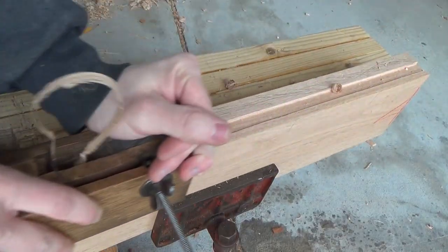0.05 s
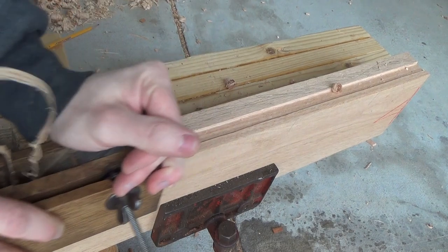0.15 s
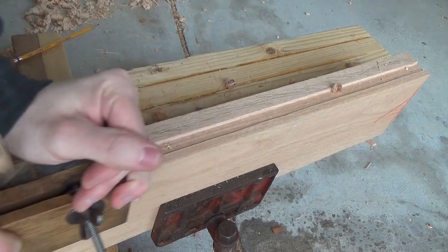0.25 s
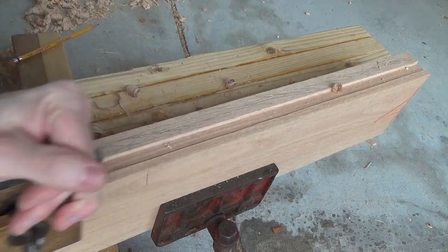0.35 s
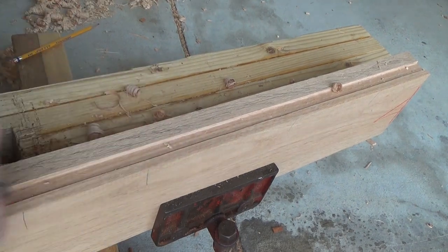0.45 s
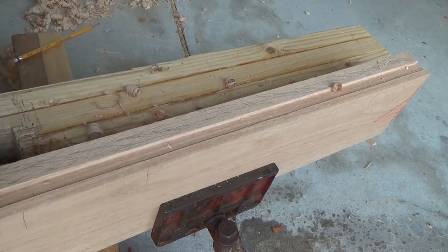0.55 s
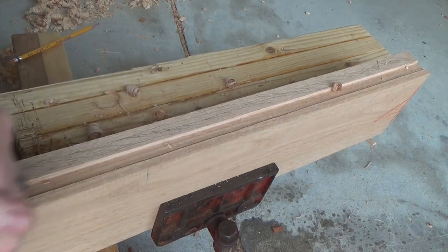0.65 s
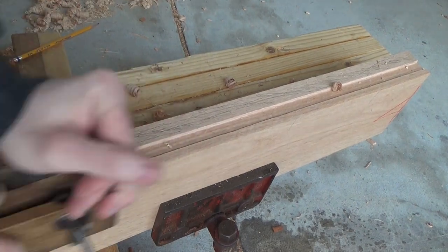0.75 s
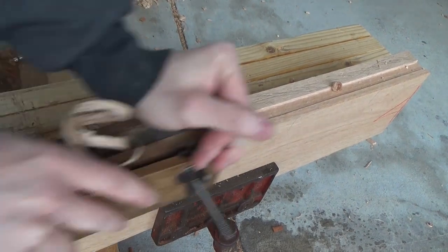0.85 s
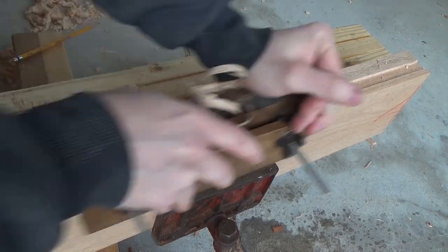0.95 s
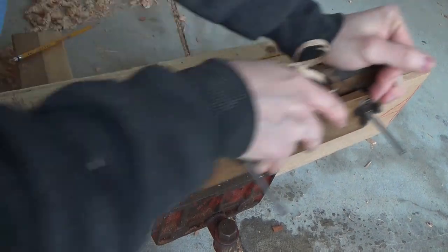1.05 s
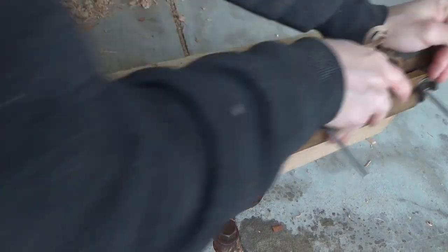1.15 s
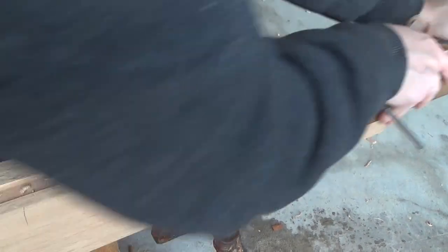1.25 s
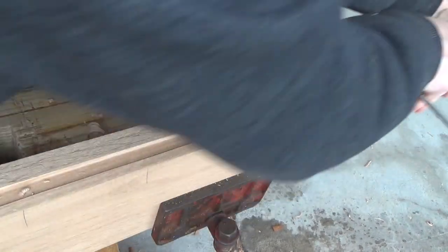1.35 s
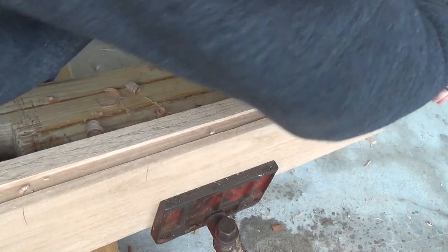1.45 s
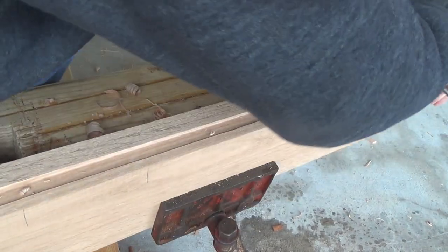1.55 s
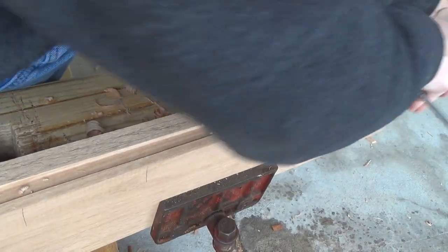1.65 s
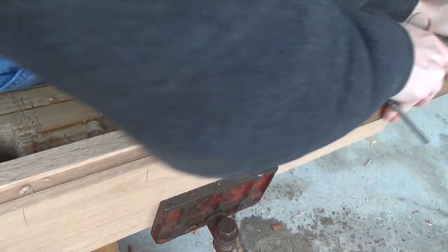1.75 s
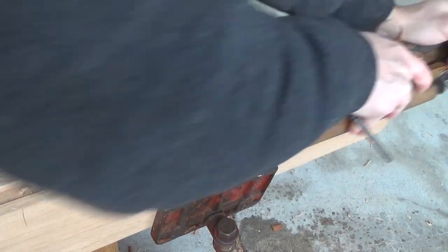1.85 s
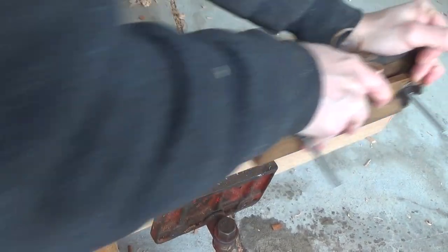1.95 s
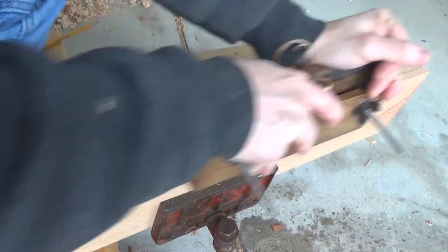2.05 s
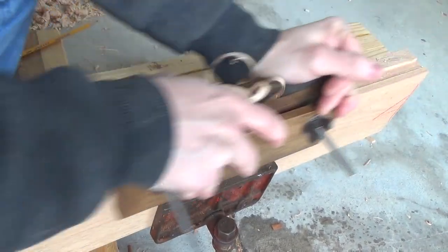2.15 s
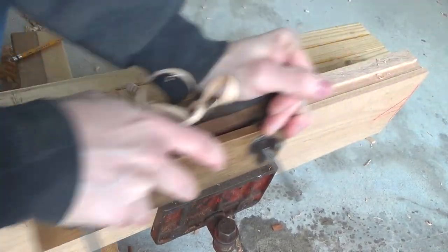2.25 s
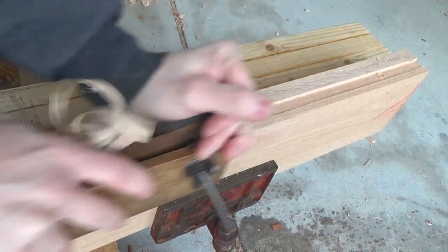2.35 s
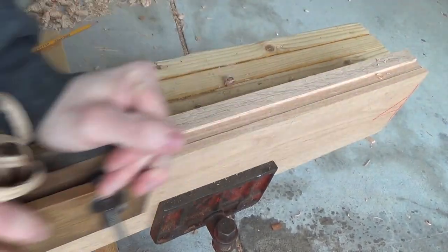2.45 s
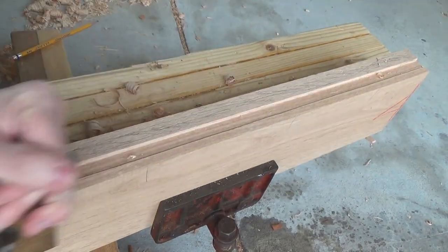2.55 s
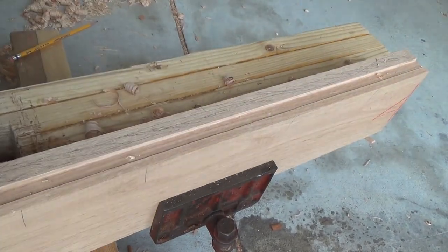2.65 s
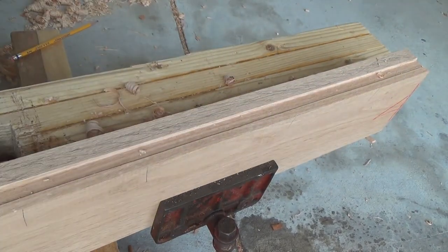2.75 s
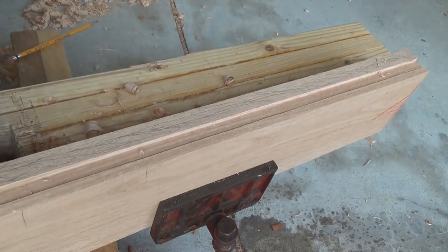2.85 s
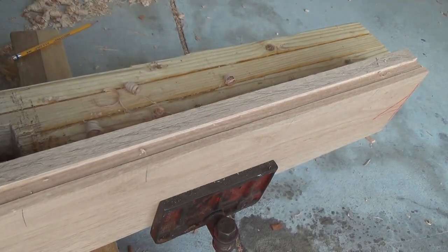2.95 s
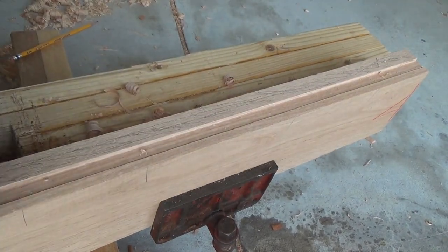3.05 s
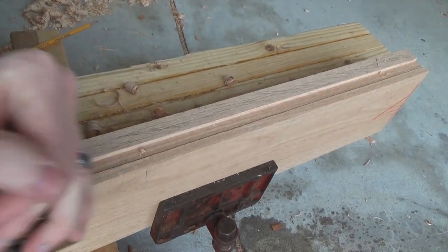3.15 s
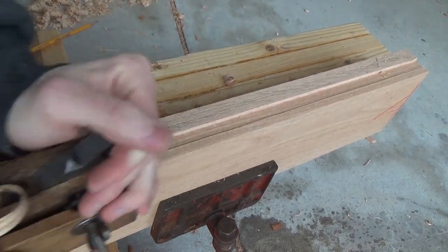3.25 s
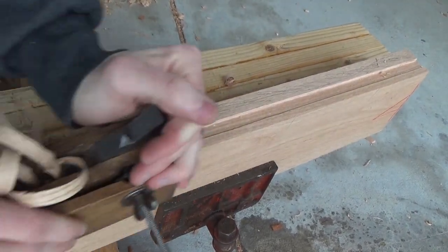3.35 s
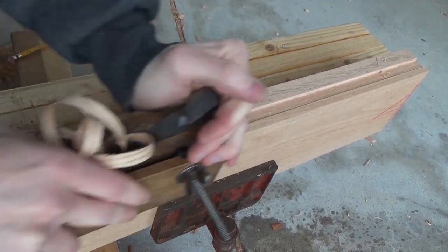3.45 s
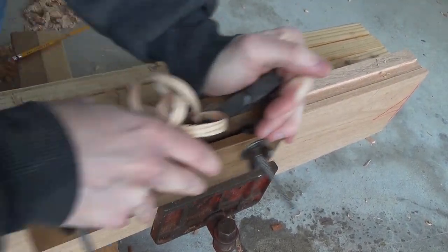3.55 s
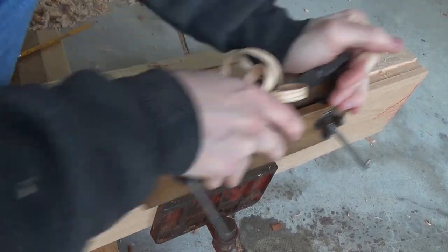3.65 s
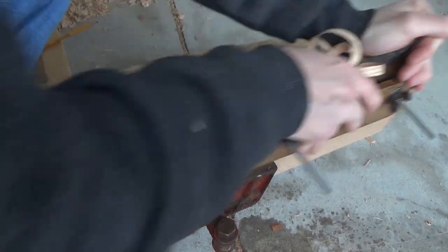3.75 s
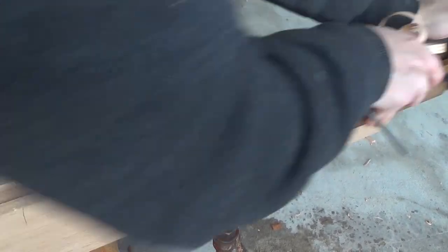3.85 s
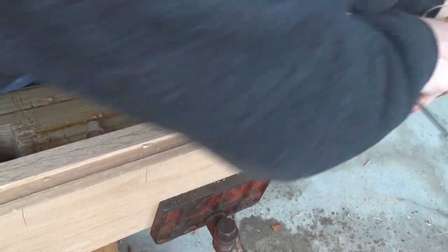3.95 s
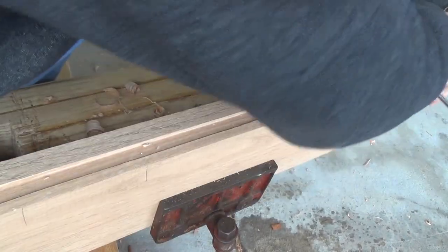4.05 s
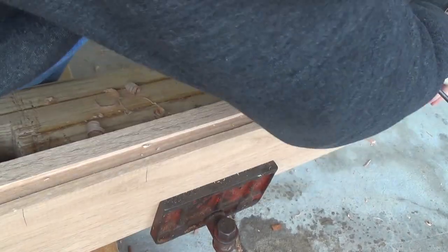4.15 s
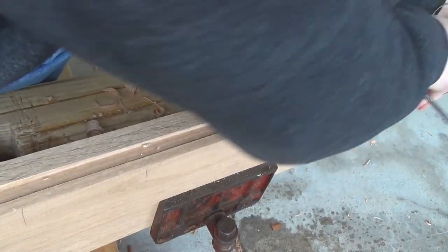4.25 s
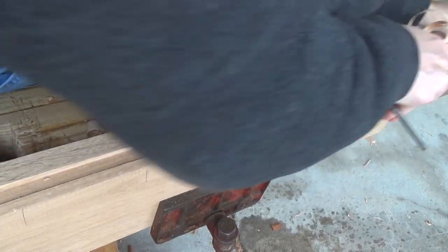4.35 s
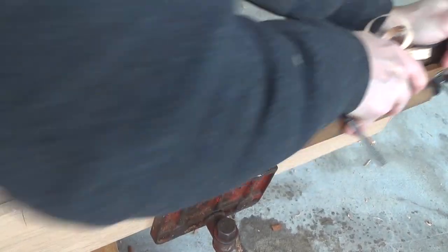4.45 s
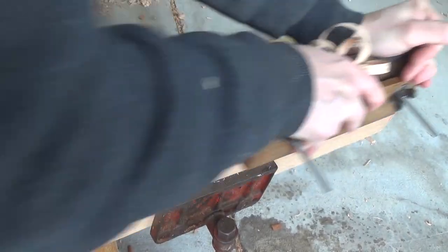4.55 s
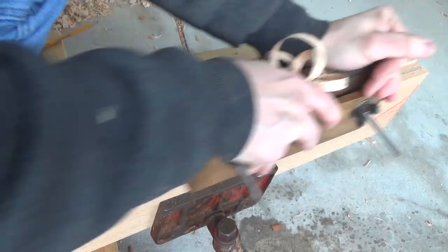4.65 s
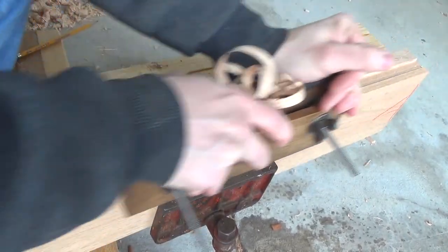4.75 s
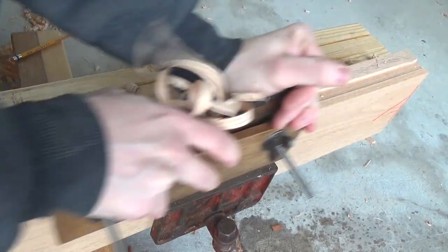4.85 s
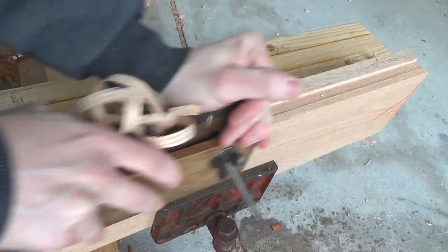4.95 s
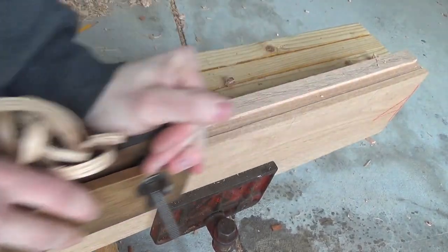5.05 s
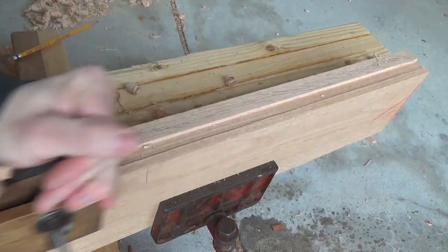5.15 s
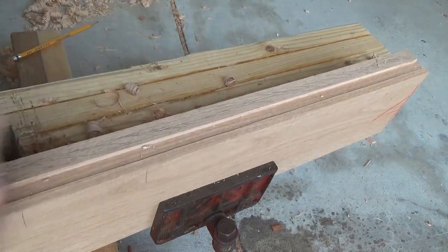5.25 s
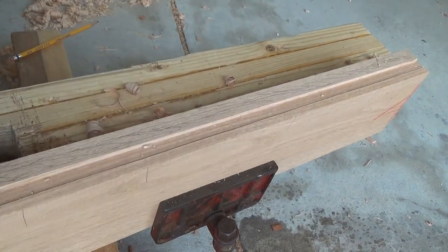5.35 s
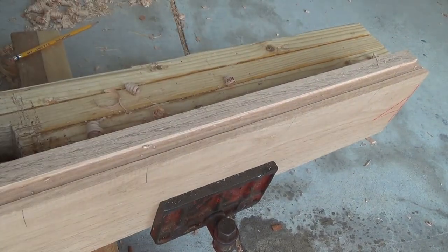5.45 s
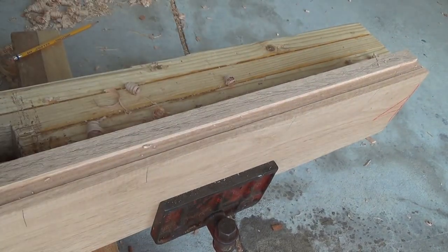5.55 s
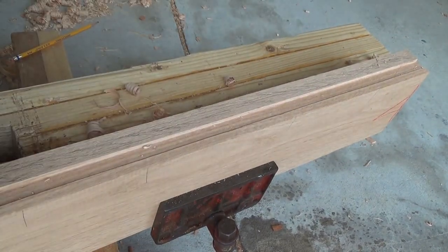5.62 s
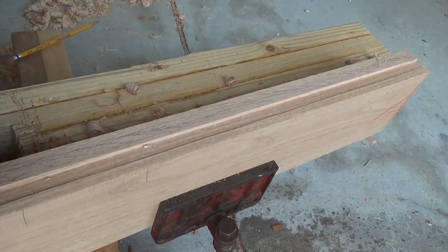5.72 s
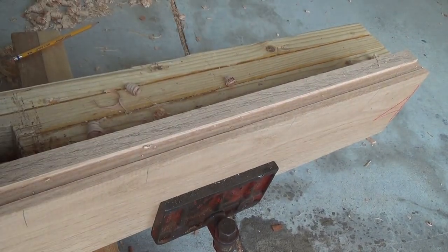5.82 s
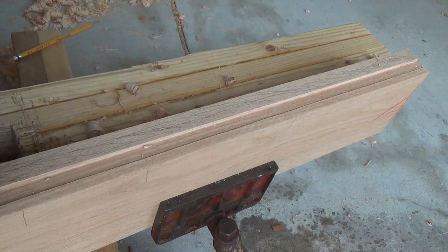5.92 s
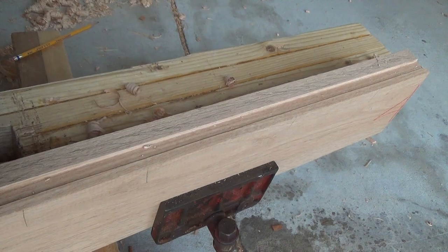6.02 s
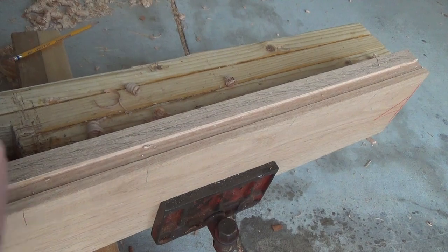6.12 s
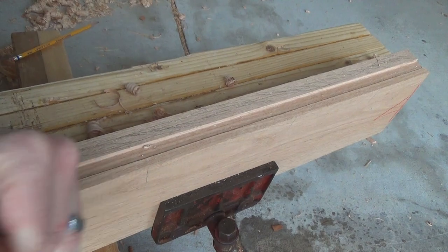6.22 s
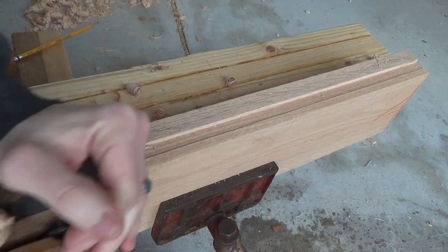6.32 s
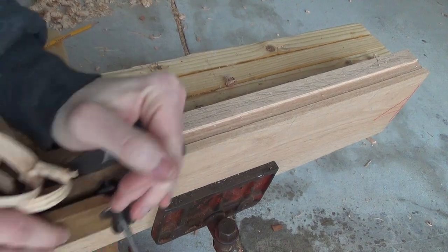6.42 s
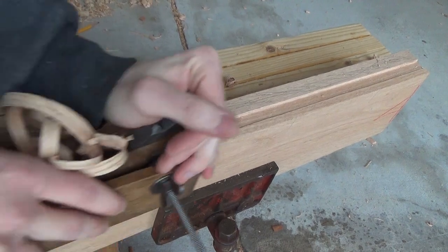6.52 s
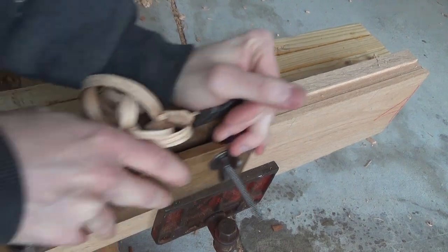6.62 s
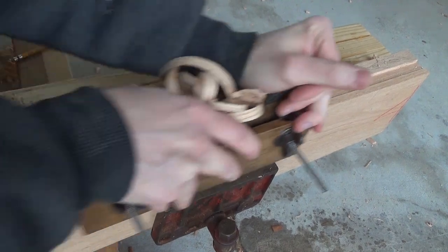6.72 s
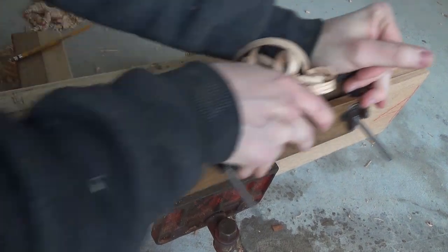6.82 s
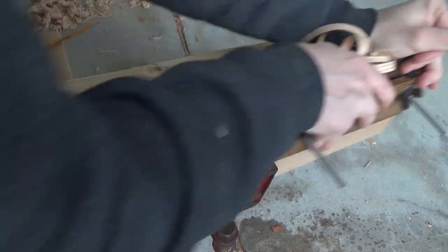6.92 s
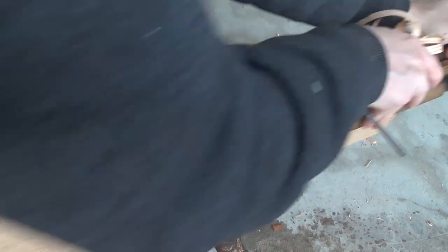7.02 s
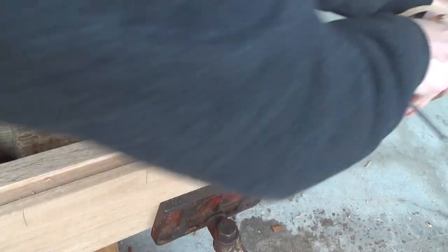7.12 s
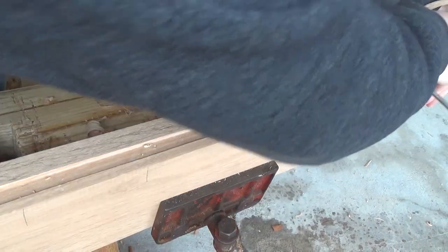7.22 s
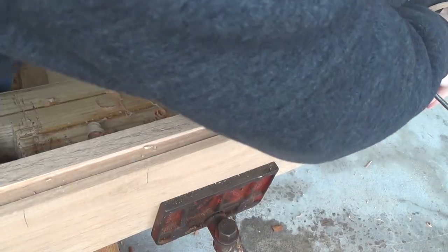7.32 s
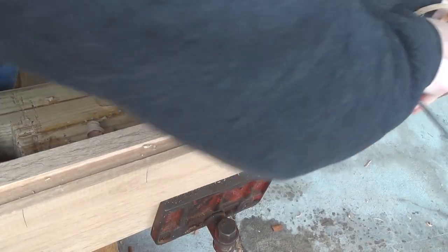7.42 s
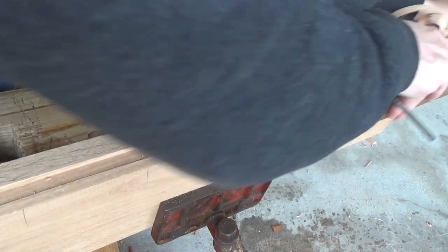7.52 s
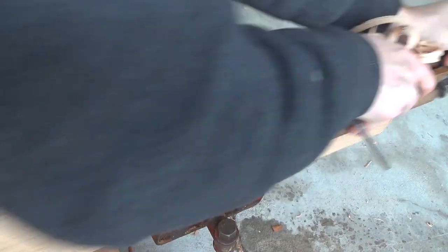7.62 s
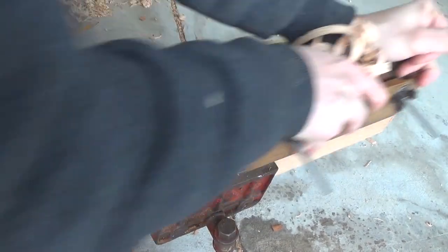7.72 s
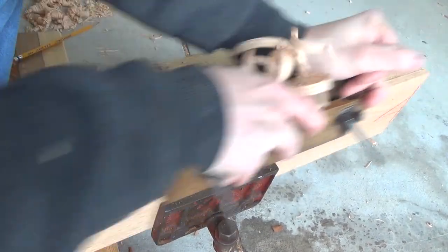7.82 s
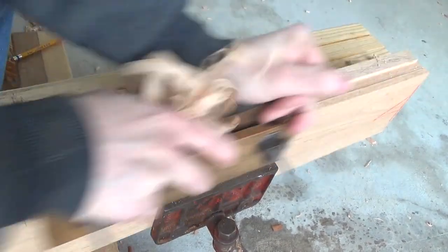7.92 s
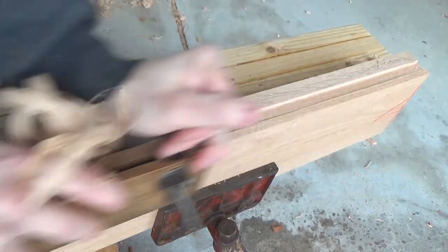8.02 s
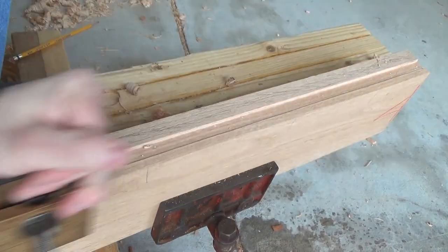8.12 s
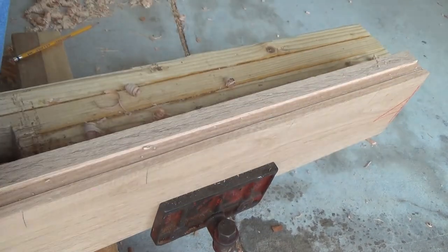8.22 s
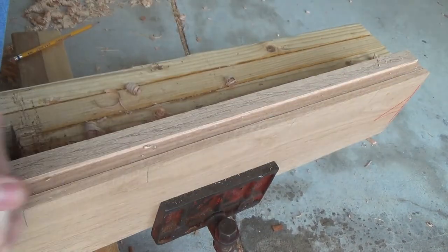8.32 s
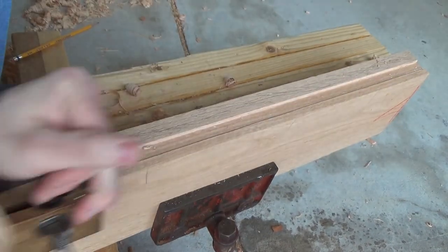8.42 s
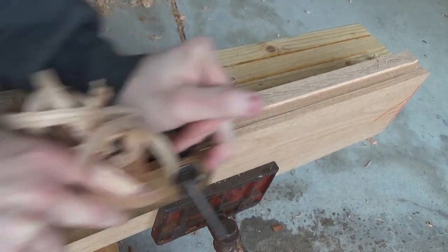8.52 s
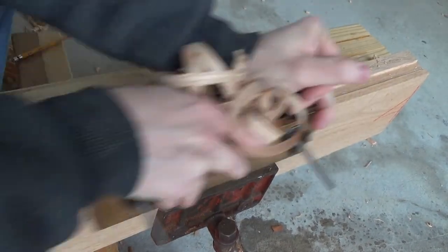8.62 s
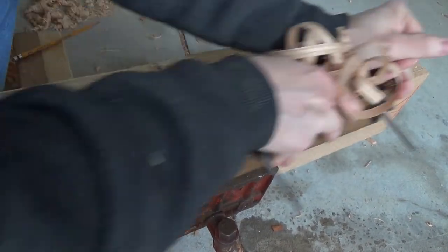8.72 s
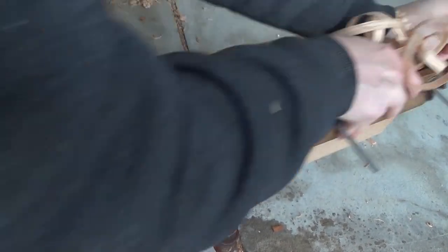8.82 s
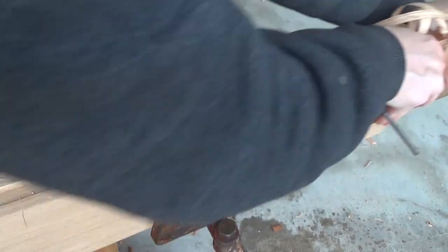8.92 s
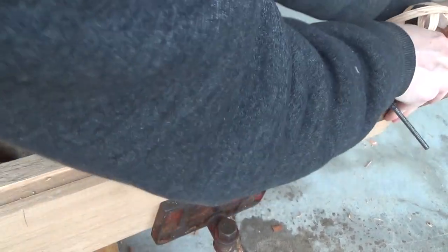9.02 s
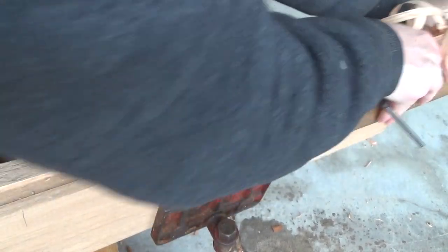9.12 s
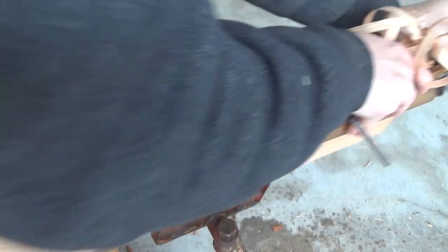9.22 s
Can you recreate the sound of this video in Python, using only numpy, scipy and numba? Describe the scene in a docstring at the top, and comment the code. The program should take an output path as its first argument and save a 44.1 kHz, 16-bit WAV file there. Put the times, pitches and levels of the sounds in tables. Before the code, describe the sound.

A wooden hand plane works a clamped hardwood board, close by in a small, slightly reverberant workshop. It opens mid-cut, a gritty rasp with a low groan, ending in clicks at 0.5 seconds. Further cuts run from 1.8 to 2.7, 4.4 to 5.3, 7.5 to 8.2 and 9.2 to 10 seconds, each growing hissier as it goes; the middle three carry a hollow, wavering blade chatter. Duller return slides begin around 0.7, 3.5, 6.5 and 8.5 seconds. The plane knocks on the board as it lands and stops, most strongly near 1.4, 5.5, 6.5, 7.2 and 8.5 seconds. Sharp small clicks cluster around 2.8, 3.5 and 6.5 seconds. Soft bumps and rustles of sleeves and shavings fill the pauses near 3 and 6 seconds. The strokes shift slightly sideways, over a low bench rumble, faint air noise and hum.

```python
"""Hand plane cutting a rebate

A wooden plane works along a hardwood board clamped in a vice, in a small workshop. On each cut the
iron breaks thousands of fibres that ring plane and board; then the sole slides back, duller.
Stick-slip makes the board groan and the iron chatter. The plane knocks as it lands and stops, fence
and shavings click, sleeves rustle, and the bench rumbles over the shop's faint air noise and hum."""
import sys
import numpy as np
from scipy import signal
from scipy.fft import rfft, irfft, next_fast_len
from scipy.io import wavfile
from scipy.ndimage import uniform_filter1d, map_coordinates
from numba import njit

SR = 44100
rng = np.random.default_rng(int(sys.argv[2]) if len(sys.argv) > 2 else 0)


def wav_record(signal):
    """Record a signal, one row per channel, as 16-bit PCM in the file named by sys.argv[1]."""
    frames = np.transpose(np.atleast_2d(signal))
    bounded = np.clip(frames, -1, 1)
    # unit amplitude maps onto the largest positive 16-bit level
    quanta = np.round(bounded * 32767).astype(np.int16)
    wavfile.write(sys.argv[1], SR, quanta)


N = 409236
TIME = np.arange(N) / SR


def undb(db):
    """Decibels to gain."""
    return 10 ** (np.asarray(db) / 20)


def unit(x):
    """Scale to rms 1."""
    return x / np.sqrt(np.mean(x ** 2))


def span(start_s, end_s):
    """Sample times from start to end."""
    return start_s + np.arange(int((end_s - start_s) * SR)) / SR


def add(out, start_s, x):
    """Mix x into out at start_s."""
    i = max(int(start_s * SR), 0)
    out[i:i + len(x)] += x[:len(out) - i]


def fade(t, t60_s):
    """Exponential decay."""
    return np.exp(-np.log(1000) * t / t60_s)


def swell(t, centre, half_width):
    """Gaussian bump, peak 1."""
    return np.exp(-((t - centre) / half_width) ** 2)


def contact(t, ramp_s=0.0088):
    """Stroke gate with short ramps."""
    return np.clip(np.minimum(t - t[0], t[-1] - t) / ramp_s, 0, 1)


def walk(n, rate_hz):
    """Smooth random drift, rms near 1."""
    hold = max(int(SR / rate_hz), 2)
    steps = np.repeat(rng.standard_normal(n // hold + 2), hold)
    return unit(uniform_filter1d(steps, hold))[:n]


def over_pitch(table, hz, column=1):
    """Interpolate a table column over log frequency."""
    rows = np.array(table, float)
    return np.interp(np.log(hz + 1), np.log(rows[:, 0]), rows[:, column])


def band(x, low_hz, high_hz):
    """Causal band-pass."""
    edges_hz = [low_hz, min(high_hz, SR / 2 - 1)]
    return signal.sosfilt(signal.butter(3, edges_hz, "band", fs=SR, output="sos"), x)


def zero_phase(x, order, hz, kind):
    """Forward-backward filter."""
    return signal.sosfiltfilt(signal.butter(order, hz, kind, fs=SR, output="sos"), x)


def body(x, colour, modes=(), size=4096):
    """Minimum-phase body: a smooth spectrum plus resonances."""
    hz = np.arange(size // 2 + 1) * SR / size
    modes_db = sum(lift / (1 + (2 * (hz - centre) / width) ** 2) for centre, width, lift in modes)
    cepstrum = irfft(np.log(undb(over_pitch(colour, hz) + modes_db)))
    cepstrum[1:size // 2] *= 2
    cepstrum[size // 2 + 1:] = 0
    response = irfft(np.exp(rfft(cepstrum)))
    return signal.fftconvolve(x, response)[:len(x)]


def fibres(n, snaps_per_s, spread_db):
    """Dense tiny snaps of uneven size."""
    snaps = rng.random(n) < snaps_per_s / SR
    signs = rng.choice([-1, 1], n)
    sizes = undb(spread_db * np.minimum(rng.exponential(size=n), 5))
    return unit(snaps * signs * sizes)


def shift_modes(x, depth_db=3.2, full_depth_hz=2500, size=512):
    """Small modes swell and sink as grip and contact point move."""
    hz, _, frames = signal.stft(x, nperseg=size)
    patches = rng.standard_normal(frames.shape)
    for _ in range(2):
        patches = uniform_filter1d(patches, size=2, axis=0)
        patches = uniform_filter1d(patches, size=14, axis=1)
    change_db = depth_db * np.minimum(hz / full_depth_hz, 1)[:, None] * unit(patches)
    return signal.istft(frames * undb(change_db), nperseg=size)[1][:len(x)]


def ring_wood(force, colour, modes, place):
    """The wood's modes trade strength as the plane travels from place 0 to 1."""
    early = body(force, colour, [(hz, width, db) for hz, width, db, _ in modes])
    late = body(force, colour, [(hz, width, db) for hz, width, _, db in modes])
    share = np.sin(np.pi / 2 * np.clip(place, 0, 1)) ** 2
    return shift_modes((1 - share) * early + share * late)


def balance(wood, judder_db, ring_db, hiss_db, top_db):
    """Split the wood's vibration into four bands, each with its own level."""
    judder = zero_phase(wood, 4, 540, "low")
    treble = zero_phase(wood, 2, 2600, "high")
    top = zero_phase(treble, 3, 7000, "high")
    parts = [(judder, judder_db, (140, 500)), (wood - judder - treble, ring_db, (700, 2000)),
             (treble - top, hiss_db, (2500, 6500)), (top, top_db, (7000, 14000))]
    return sum(part * undb(db) / np.std(band(wood, *core_hz)) for part, db, core_hz in parts)


# reflections off board, vice and hands: initial_lag_s, gain
CLOSE_ECHOES = [(0.00056, 0.11), (0.00108, 0.18), (0.00131, -0.17), (0.002, -0.16)]


def close_echoes(x, place, lag_growth=0.275):
    """Echo lags grow along the stroke, so comb ridges in the treble sink."""
    stretch = 1 + lag_growth * place ** 2
    treble = zero_phase(x, 2, [1600, 7000], "band")
    return x + sum(gain * map_coordinates(treble, [np.arange(len(x)) - lag_s * stretch * SR], order=3)
                   for lag_s, gain in CLOSE_ECHOES)


# cuts, far end (place 0) to near end (1): start_s, end_s, bite_s, ring_db, hiss_db, shaving_db,
# judder_db, loosest_place, judder_fall_db_per_length
CUT_STROKES = [(-0.5, 0.5, 0.2, -15.5, -24.5, -22.5, -25.5, 0.62, 23),
               (1.755, 2.667, 0.072, -13, -22, -20.5, -21.5, 0.11, 10.5),
               (4.375, 5.307, 0.25, -13.5, -20.5, -20, -23.5, 0.53, 25.5),
               (7.52, 8.23, 0.18, -13, -19, -18.5, -23, 0, 18.5),
               (9.18, 10.0, 0.071, -14, -26, -23, -26, 0.2, 15)]
# cutting spectrum: freq_hz, level_db
CUT_SPECTRUM = [(25, -48), (60, -30), (110, -20), (165, -3.5), (380, -6.5), (560, -4), (1200, 2.5),
                (1900, 0.5), (3600, -5.5), (7000, -4), (9800, 1), (12500, -6), (16000, -17)]
# plane and board modes: centre_hz, width_hz, early_lift_db, late_lift_db
CUT_RESONANCES = [(255, 34, 5, 4.5), (461.5, 16, 4.5, 8.5), (642, 25, 14.5, 6), (774, 73, 8.5, 10.5),
                  (1007, 54, 8, 9.5), (1080, 23, 15, -2), (1337, 243, 0.5, 12), (1550, 90, 10, -1),
                  (2170, 110, 4.5, 3.5), (2440, 110, 4, 6.5), (2810, 190, 9, 4.5), (3054, 140, 6.5, 8),
                  (3940, 180, 6.5, 3.5), (5290, 620, 6, 9.5), (5970, 95, -1, 8), (8460, 880, 3.5, 4),
                  (12100, 2100, -4, 4)]
# hard spots and skips of the iron: centre_s, half_width_s, change_db
HARD_SPOTS = [(0.288, 0.018, 3), (0.368, 0.0076, -8), (0.427, 0.055, 3.8), (2.627, 0.029, 1.5),
              (5.28, 0.02, -1.5), (5.314, 0.0063, -9)]


def cutting(burst_hz=420, grain_hz=55.33, exit_db=6.5, exit_s=0.012, run_out_db_per_s=126):
    """The iron breaks fibres in uneven bursts; the ring fades and the growing shaving swells."""
    out = np.zeros(N)
    for start, end, bite_s, ring_db, hiss_db, shaving_db, judder_db, loosest, fall in CUT_STROKES:
        t = span(max(start, 0), end + 0.3)
        n = len(t)
        place = np.minimum((t - start) / (end - start), 1)
        force = fibres(n, snaps_per_s=9000, spread_db=1.5) * undb(walk(n, burst_hz) + walk(n, grain_hz))
        wood = ring_wood(force, CUT_SPECTRUM, CUT_RESONANCES, place / 0.72)
        shallow = np.clip(1 - (t - start) / bite_s, 0, 1)  # 0 at full bite
        cut = balance(close_echoes(wood, place),
                      judder_db=judder_db - fall * abs(place - loosest),
                      ring_db=ring_db - 9 * shallow - 5 * place,
                      hiss_db=hiss_db - 4.5 * shallow + 2 * place,
                      top_db=shaving_db - 8 * (1 - swell(place, centre=0.72, half_width=0.26)))
        spots_db = sum(db * swell(t, centre_s, half_s) for centre_s, half_s, db in HARD_SPOTS)
        after_s = np.maximum(t - end, 0)  # the iron leaves the wood, then the sole runs out
        release_db = exit_db * np.minimum(after_s / exit_s, 1) + run_out_db_per_s * after_s
        add(out, t[0], cut * undb(spots_db - release_db) * contact(t))
    return undb(-0.23) * out


@njit
def resonate(x, centre_hz, width_hz):
    """State-variable band-pass with a moving centre."""
    out = np.empty(len(x))
    band_state, low_state = 0., 0.
    for i in range(len(x)):
        tuning, damping = np.tan(np.pi * centre_hz[i] / SR), width_hz / centre_hz[i]
        passed = (band_state + tuning * (x[i] - low_state)) / (1 + tuning * (tuning + damping))
        band_state = 2 * passed - band_state
        low_state += 2 * tuning * passed
        out[i] = damping * passed
    return out


def stick_slip(glides, width_hz):
    """Stick and slip gather in one band, which glides with the speed and pressure of the push."""
    out = np.zeros(N)
    for glide in glides:
        times_s, pitches_hz, levels_db = np.transpose(glide)
        t = span(times_s[0], times_s[-1])
        centre_hz = np.interp(t, times_s, pitches_hz)
        slips = fibres(len(t), snaps_per_s=3000, spread_db=2)
        tone = unit(resonate(resonate(slips, centre_hz, width_hz), centre_hz, width_hz))
        envelope = undb(np.interp(t, times_s, levels_db)) * signal.windows.tukey(len(t), 0.15)
        add(out, times_s[0], tone * envelope)
    return out


# board groans: start_s, length_s, first_hz, last_hz, level_db
BOARD_GROANS = [(0.0, 0.39, 198, 165, -24.5), (0.678, 0.15, 160, 219, -28), (8.47, 0.12, 187, 198, -31)]


def groaning(gain_db=-2.5):
    """The board groans low under the dragging plane."""
    glides = [[(start_s, first_hz, db), (start_s + length_s, last_hz, db)]
              for start_s, length_s, first_hz, last_hz, db in BOARD_GROANS]
    return undb(gain_db) * stick_slip(glides, width_hz=56.0)


# bench shakes: centre_s, half_width_s, level_db
BENCH_SHAKES = [(0.15, 0.44, -37.5), (1.483, 0.065, -33), (1.9, 0.43, -35.5), (2.876, 0.43, -29.5),
                (3.584, 0.13, -33), (5.575, 0.09, -32), (6.2, 0.42, -38), (7.27, 0.055, -30),
                (7.6, 0.13, -35), (8.55, 0.08, -39), (9.26, 0.13, -31)]
# rumble spectrum: freq_hz, level_db
RUMBLE_SPECTRUM = [(15, -4), (35, -11), (70, -1.5), (130, -1), (220, -12), (400, -21.5), (1000, -57),
                   (4000, -80)]


def bench_rumble(tremble_db=-45.5, shake_gain_db=-2, sway_hz=26):
    """Bench and floor shake under shifting weight and are never quite still."""
    force = rng.standard_normal(N) * undb(walk(N, sway_hz))
    shakes = sum(undb(db) * swell(TIME, centre_s, half_s) for centre_s, half_s, db in BENCH_SHAKES)
    return unit(body(force, RUMBLE_SPECTRUM)) * (undb(tremble_db) + undb(shake_gain_db) * shakes)


# air noise spectrum: freq_hz, level_db
AIR_SPECTRUM = [(20, -11.5), (100, -3.5), (260, 0.5), (500, -5.5), (850, -4), (1400, -8), (2500, -18),
                (4500, -27.5), (11000, -29.5), (16000, -39)]
# hum partials: pitch_hz, level_db
SHOP_HUM = [(232, -44.5), (807, -50), (1475, -56), (3149, -68)]
# thin whine: pitch_hz, level_db
SHOP_WHINE = [(15735, -67)]


def shop_noise(air_db=-37, swell_db=3.5, stereo_spread=0.39):
    """Air noise with one slow swell, a faint wavering hum and a thin whine."""
    common, left, right = (unit(body(rng.standard_normal(N), AIR_SPECTRUM)) for _ in range(3))
    air = common + stereo_spread * np.array([left, right])
    tones = sum(np.sqrt(2) * undb(db) * np.sin(2 * np.pi * hz * TIME + walk(N, rate_hz=12))
                for hz, db in [*SHOP_HUM, *SHOP_WHINE])
    return air * undb(air_db + swell_db * swell(TIME, centre=6.53, half_width=1.7)) + tones


# fence, wedge and snapping shavings: start_s, level_db, centre_hz
CLICK_EVENTS = [(0.5105, -7, 5130), (0.525, -10, 2848), (0.6335, -17, 4000), (0.6514, -17.5, 2920),
                (1.5414, -17.5, 5160), (2.77, -6, 2690), (2.8544, -17, 5270), (2.9317, -19, 5680),
                (3.3694, -26.5, 2100), (3.4704, -2, 2900), (3.4872, -3, 3640), (3.54, -7, 5600),
                (3.624, -5.5, 5330), (5.3264, -10, 4950), (5.4316, -8.5, 4510), (5.4426, -12.5, 2700),
                (6.186, -25, 2840), (6.4903, -2.5, 5660), (6.526, -5.5, 2340), (6.547, -10.5, 5650),
                (6.664, -12, 2980), (7.5605, -5, 4930), (8.4756, -10, 4520), (9.1716, -14, 2630)]
# hard contact spectrum: freq_hz, level_db
CRACK_SPECTRUM = [(800, -29), (2000, 6), (2900, 5.5), (6500, 7), (10000, 0.5), (16000, -27)]
# fence and wedge modes: centre_hz, width_hz, lift_db
FENCE_RESONANCES = [(2730, 220, 5), (3950, 240, 2.5), (4600, 510, 6), (5430, 220, -1.5), (6700, 350, 1)]


def clicks(width_hz=700, lift_db=11, t60_s=0.032):
    """Small hard contacts ring the fence, each with one resonance of its own."""
    out, t = np.zeros(N), span(0, 1 / 8)
    for start_s, level_db, centre_hz in CLICK_EVENTS:
        burst = rng.standard_normal(len(t)) * fade(t, t60_s)
        click = body(burst, CRACK_SPECTRUM, [*FENCE_RESONANCES, (centre_hz, width_hz, lift_db)])
        add(out, start_s, undb(level_db) * click / np.abs(click).max())
    return out


# sliding spectrum: freq_hz, level_db
SOLE_SPECTRUM = [(25, -38), (55, -21), (120, -4.5), (300, 2), (600, -5.5), (1200, 1), (2000, -1.5),
                 (3800, -6), (7200, -9), (10000, -9.5), (12000, -14.5), (16000, -32)]
# modes while sliding: centre_hz, width_hz, early_lift_db, late_lift_db
SOLE_RESONANCES = [(245, 52, 5.5, -4.5), (319, 83, 3, 13.5), (448, 53, 6, 11.5), (888, 34, 10.5, 11),
                   (1052, 180, 5, 15.5), (1338, 180, 14, 5), (1584, 43, 4, 7), (2400, 780, 2, 1.5),
                   (2940, 270, 7.5, 6), (5230, 970, 6, 3), (6130, 220, 0, 2), (8500, 280, 3.5, -0.5)]


def rubbing(place, stick_db=0.5, stick_hz=300, grain_db=1.37, grain_hz=44.7):
    """The sole rubs over the fresh cut, catching lightly on the grain."""
    n = len(place)
    snaps = fibres(n, snaps_per_s=9000, spread_db=2)
    catch_db = stick_db * walk(n, stick_hz) + grain_db * walk(n, grain_hz)
    return ring_wood(snaps * undb(catch_db), SOLE_SPECTRUM, SOLE_RESONANCES, place)


# return strokes: start_s, fastest_s, end_s, ring_db, hiss_db, judder_db, settle_db, rise_db_per_s,
# ring_fall_db_per_s, hiss_fall_db_per_s
RETURN_STROKES = [(0.66, 0.98, 1.387, -20, -20, -28.5, -4, 45.5, -7.5, 10.5),
                  (3.46, 3.783, 3.983, -20, -24.5, -31, 12.5, 9.5, 10, 16),
                  (6.49, 6.84, 7.26, -16.5, -21.8, -32.5, 18.5, 35.5, 24, 21.5),
                  (8.48, 8.654, 9.0, -16.5, -18.5, -34.5, 10.5, 66, 26, 34)]


def sliding_back(lead_s=0.17, travel_s=0.52, settle_s=0.24, stop_db_per_s=97, gain_db=-0.82):
    """The plane is drawn back: it gathers speed, then dulls as it moves away and comes to rest."""
    out = np.zeros(N)
    for start, fastest, end, ring, hiss, judder, settle, rise, ring_fall, hiss_fall in RETURN_STROKES:
        t = span(start, end + 0.3)
        before_s, after_s = np.maximum(fastest - t, 0), np.maximum(t - fastest, 0)
        place = np.minimum((t - start) / (end - start), 1)
        sole = close_echoes(rubbing((t - start - lead_s) / travel_s), place)
        judder_db = judder + settle * swell(t, start, settle_s)
        ring_db = ring - rise * before_s - ring_fall * after_s
        hiss_db = hiss - rise * before_s - hiss_fall * after_s
        slide = balance(sole, judder_db, ring_db, hiss_db, top_db=hiss_db - 2.5)
        stopping = undb(-stop_db_per_s * np.maximum(t - end, 0))
        add(out, start, slide * stopping * contact(t))
    return undb(gain_db) * out


# modes of the clamped board: pitch_hz, level_db, t60_s
BOARD_MODES = [(109.7, -9.5, 0.42), (179, -1.5, 0.15), (200, -1, 0.15), (243.1, -4.5, 0.59),
               (310.5, -3, 0.28), (392.2, 2.5, 0.12), (437, -5.5, 0.26), (514, 2.5, 0.056), (668, 0, 0.09),
               (847, -3, 0.14)]


def board_thud(t, centre_hz, focus_db_per_octave=7, detune=0.017, push_s=0.00063):
    """A short push rings the board; each spot struck favours the modes near its own centre_hz."""
    thud = np.zeros(len(t))
    for (hz, db, t60_s), chance in zip(BOARD_MODES, rng.standard_normal(len(BOARD_MODES))):
        gain = np.sign(chance) * undb(db - focus_db_per_octave * abs(np.log2(hz / centre_hz)))
        thud += gain * np.sin(2 * np.pi * hz * (1 + detune * chance) * t) * fade(t, t60_s)
    thud *= 1 - np.exp(-t / push_s)
    return thud / np.abs(thud).max()


# plane landing or stopping: start_s, thud_db, clack_db, crack_db, thud_centre_hz
KNOCK_EVENTS = [(1.004, -11, -17, -23, 304), (1.402, -5, -24, -43, 335), (1.426, -0.5, -22, -15, 331),
                (1.754, -14, -17.5, -15, 458), (2.815, -13.5, -15.5, -29, 396), (3.455, -8, -22, -32, 213),
                (3.532, -6.5, -23, -20, 240), (4.041, -16.5, -17, -22, 336), (4.374, -15, -21.5, -19, 307),
                (5.505, -1.5, -14.5, -17.5, 518), (5.532, 1, -24, -27, 480), (5.542, -4, -16, -23, 277),
                (6.479, 0.5, -17.5, -28, 433), (7.235, -1, -23, -21, 370), (7.516, -12, -19, -16.5, 226),
                (7.575, -5, -33, -34, 240), (8.47, -1.5, -15, -18, 207), (8.527, -29, -23, -18, 245),
                (9.18, -10, -27, -35, 304)]
# spectrum of the plane's stock: freq_hz, level_db
STOCK_SPECTRUM = [(200, -20), (550, -1), (900, 7.5), (1350, 6.5), (1900, -1), (2800, -3), (6000, -80)]


def knocks():
    """Wood on wood: the board thuds, the plane's stock clacks, the contact cracks."""
    out, t = np.zeros(N), span(0, 0.5)
    attack = t < 0.02
    for start_s, thud_db, clack_db, crack_db, centre_hz in KNOCK_EVENTS:
        thud = board_thud(t, centre_hz)
        clack = body(rng.standard_normal(len(t)) * fade(t, t60_s=0.13), STOCK_SPECTRUM)
        crack = body(rng.standard_normal(len(t)) * fade(t, t60_s=0.2), CRACK_SPECTRUM)
        add(out, start_s, undb(thud_db - 5) * thud)
        add(out, start_s, undb(clack_db - 1) * clack / np.std(clack[attack]))
        add(out, start_s, undb(crack_db - 2) * crack / np.std(crack[attack]))
    return out


# soft bumps: start_s, level_db
BUMP_EVENTS = [(1.47, -14), (2.77, -17), (2.974, -14), (3.052, -15), (3.087, -16.5), (5.845, -17.5),
               (6.018, -18.5), (6.159, -27), (6.415, -20)]
# bump spectrum: freq_hz, level_db
BUMP_SPECTRUM = [(25, -29), (70, 0), (130, -7), (230, -3), (400, -22.5), (1200, -38), (4000, -54)]


def bumps(t60_s=0.14, gain_db=-2):
    """Feet and body bump dully at the bench."""
    out, t = np.zeros(N), span(0, 1 / 3)
    for start_s, level_db in BUMP_EVENTS:
        bump = body(rng.standard_normal(len(t)) * fade(t, t60_s), BUMP_SPECTRUM)
        add(out, start_s, undb(level_db + gain_db) * bump / np.abs(bump).max())
    return out


# faint glides of the sole: start_s, end_s, final_hiss_db
RUN_UP_GLIDES = [(1.599, 1.76, -30.5), (4.241, 4.381, -31.5), (7.382, 7.522, -34.5), (8.37, 8.48, -41),
                 (9.106, 9.186, -36)]


def run_ups(rise_db_per_s=80):
    """The sole gathers speed just before a stroke takes hold."""
    out = np.zeros(N)
    for start_s, end_s, final_db in RUN_UP_GLIDES:
        t = span(start_s, end_s)
        sole = balance(rubbing(np.ones(len(t))), judder_db=-1, ring_db=-1, hiss_db=0, top_db=0)
        add(out, start_s, sole * undb(final_db - rise_db_per_s * (end_s - t)) * contact(t))
    return out


# iron chatter, one list of points per glide: time_s, centre_hz, level_db
CHATTER_GLIDES = [
    [(1.84, 1390, -27), (1.98, 1340, -14.5), (2.12, 1096, -19), (2.2, 1110, -16)],
    [(4.5, 1970, -19), (4.55, 1540, -16), (4.6, 1118, -14), (4.68, 1260, -18), (4.84, 1050, -25),
     (4.9, 1096, -27)],
    [(7.63, 1050, -8), (7.68, 1100, -20), (7.75, 1330, -11.5), (7.82, 1370, -12.5), (7.88, 1003, -13),
     (7.94, 1100, -22)],
]


def chattering(gain_db=-2):
    """The iron chatters in a hollow, gliding band as the cut takes hold."""
    return undb(gain_db) * stick_slip(CHATTER_GLIDES, width_hz=220.0)


# hands and sleeves between strokes: peak_s, level_db, rise_s, fall_s
RUSTLE_EVENTS = [(2.82, -30, 0.026, 0.15), (3.05, -36, 0.031, 0.024), (5.62, -35, 0.021, 0.045),
                 (5.85, -37.5, 0.075, 0.05), (6.113, -30, 0.062, 0.013)]
# rustle spectrum: freq_hz, level_db
RUSTLE_SPECTRUM = [(100, -5), (300, 14), (1400, 5.5), (2500, -0.5), (6000, -1.5), (11000, -4), (16000, -8)]


def rustling(gain_db=-1):
    """Cloth and curled shavings brush and crackle while the plane is lifted."""
    envelope = sum(undb(db) * np.exp(-np.maximum((peak_s - TIME) / rise_s, (TIME - peak_s) / fall_s))
                   for peak_s, db, rise_s, fall_s in RUSTLE_EVENTS)
    crackle = body(fibres(N, snaps_per_s=2500, spread_db=2.5), RUSTLE_SPECTRUM)
    return undb(gain_db) * envelope * unit(shift_modes(crackle))


# direct path: freq_hz, left_minus_right_db, left_lead_rad
STEREO_PATH = [(31, 2.5, -0.05), (121, 1, -0.55), (262, 5, 0.04), (552, 4, -0.04), (1255, 0.3, -0.44),
               (3410, 0.7, -0.32), (9000, -0.1, 0.088)]


def direct_path(x):
    """Direct sound reaches left and right with slightly different level and phase."""
    size = next_fast_len(N + SR)
    hz = np.arange(size // 2 + 1) * SR / size
    tilt_db, lead_rad = over_pitch(STEREO_PATH, hz), over_pitch(STEREO_PATH, hz, column=2)
    left = undb(tilt_db / 2) * np.exp(1j * lead_rad / 2)
    return irfft(rfft(x, size) * np.array([left, 1 / left]), size)[:, :N]


# bearing of the plane: place (0 far, 1 near), left_minus_right_db
PLANE_BEARING = [(0, -1.2), (0.35, -2.5), (0.68, 0.2), (0.9, 2.5), (1, 3.4)]


def passing(x):
    """The plane crosses in front of the listener; at the near end its treble comes from the left."""
    far = [(start, 0) for start, *_ in CUT_STROKES] + [(end, 0) for _, _, end, *_ in RETURN_STROKES]
    near = [(end, 1) for _, end, *_ in CUT_STROKES] + [(start, 1) for start, *_ in RETURN_STROKES]
    place = np.interp(TIME, *np.transpose(sorted(far + near)))
    pan_db = np.interp(place, *np.transpose(PLANE_BEARING))
    treble = zero_phase(x, 3, [900, 8500], "band")
    return x - treble + treble * undb(np.array([pan_db, -pan_db]) / 2)


# workshop reverberation: freq_hz, t60_s, level_db
WORKSHOP_REVERB = [(102, 0.22, -7), (304.6, 0.56, -1.5), (1200, 0.49, -7.5), (4030, 0.46, -7.5),
                   (7980, 0.47, -8.5), (14000, .2, -86)]


def room(x, first_echo_s=0.002, near_db=-1, near_t60_s=0.07):
    """Close reflections from bench and floor, then a tail with its own decay in each octave."""
    t = span(0, 0.7)
    response = np.zeros((2, len(t)))
    near = undb(near_db) * fade(t, near_t60_s)
    for low_hz in 45 * 2. ** np.arange(9):
        centre_hz = low_hz * np.sqrt(2)
        tail = fade(t, over_pitch(WORKSHOP_REVERB, centre_hz))
        envelope = (t > first_echo_s) * (near + tail)
        echoes = rng.standard_normal((2, len(t))) * envelope / np.sqrt(np.sum(envelope ** 2))
        level_db = over_pitch(WORKSHOP_REVERB, centre_hz, column=2)
        response += undb(level_db) * band(echoes, low_hz, 2 * low_hz)
    return signal.fftconvolve(x[None], response, axes=1)[:, :N]


def scene():
    """The work at the bench, direct and through the room, over the shop noise."""
    strokes = chattering() + groaning() + cutting() + sliding_back() + run_ups()
    work = strokes + knocks() + clicks() + bumps() + bench_rumble() + rustling()
    return passing(direct_path(work)) + room(work) + shop_noise()


def record(dry, ceiling=1.6, cutoff_hz=15900):
    """Soft clip, then a steep low-pass."""
    rounded = ceiling * np.tanh(dry / ceiling)
    return signal.sosfilt(signal.ellip(8, 0.2, 70, cutoff_hz, fs=SR, output="sos"), rounded)


dry = scene()
out = record(dry)
wav_record(out)
```